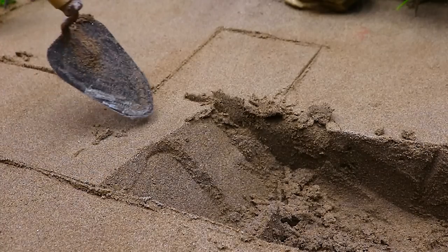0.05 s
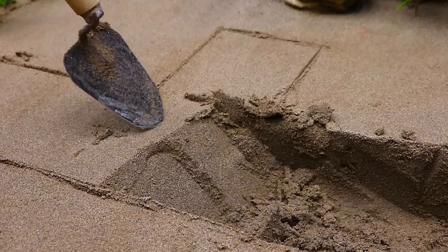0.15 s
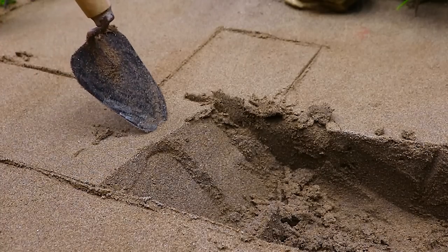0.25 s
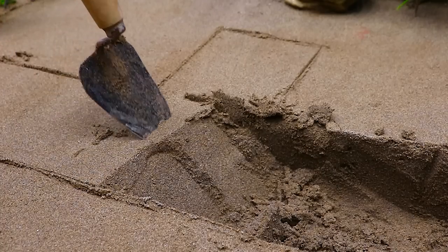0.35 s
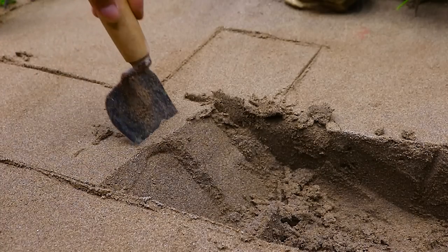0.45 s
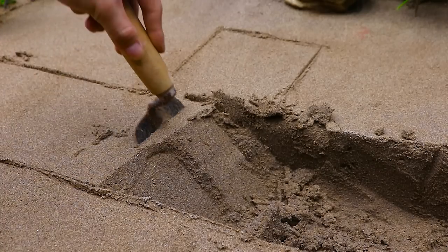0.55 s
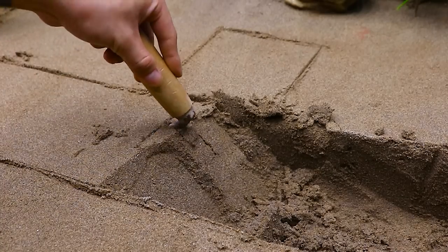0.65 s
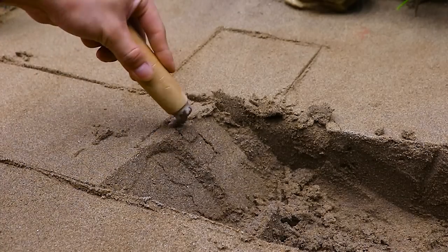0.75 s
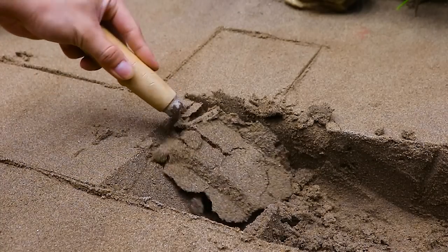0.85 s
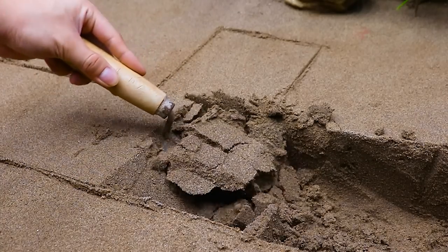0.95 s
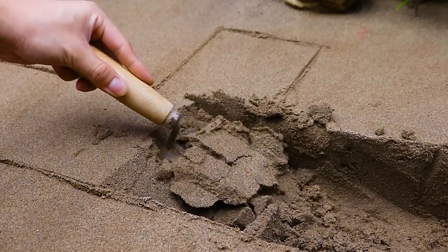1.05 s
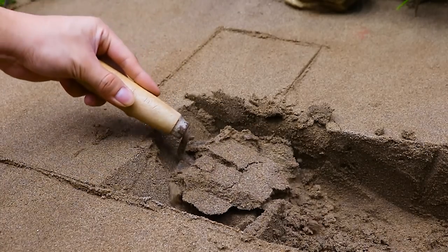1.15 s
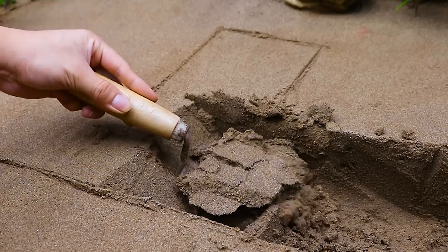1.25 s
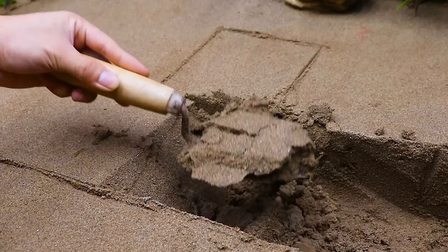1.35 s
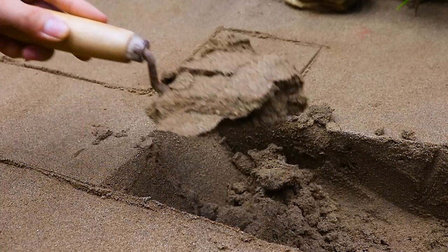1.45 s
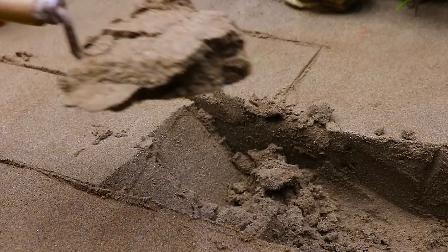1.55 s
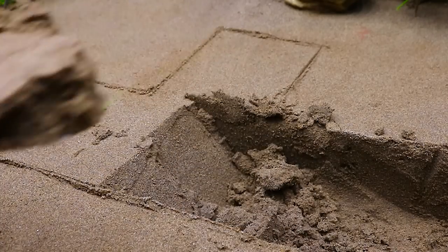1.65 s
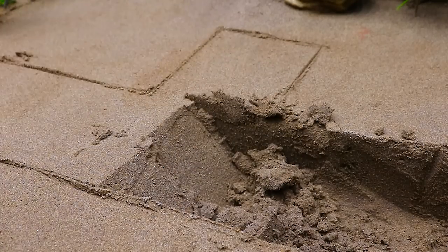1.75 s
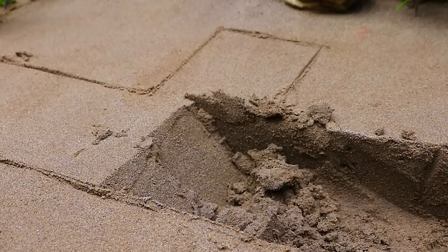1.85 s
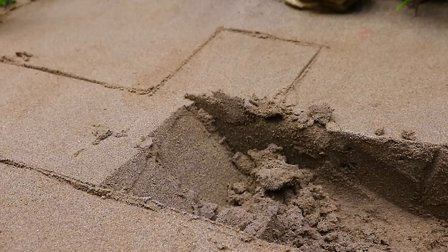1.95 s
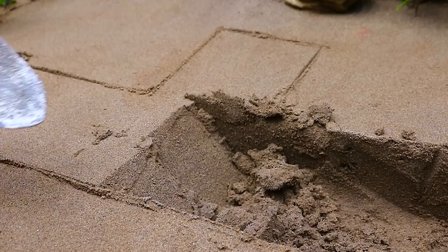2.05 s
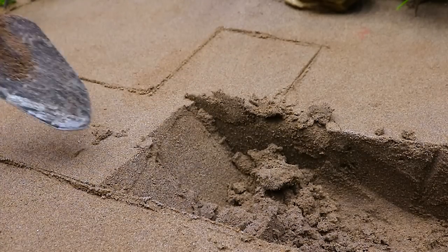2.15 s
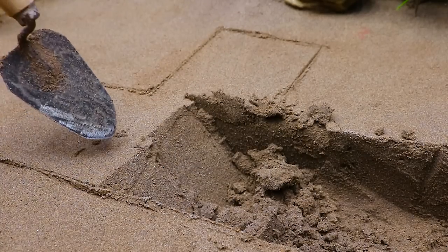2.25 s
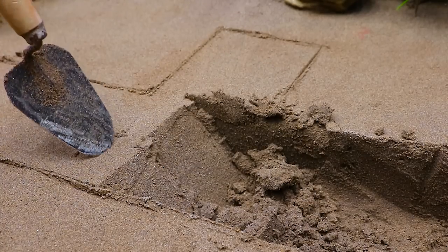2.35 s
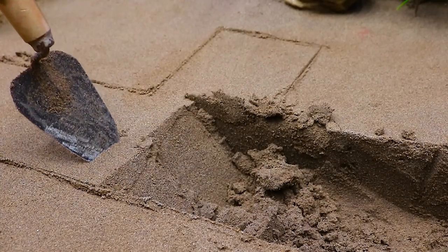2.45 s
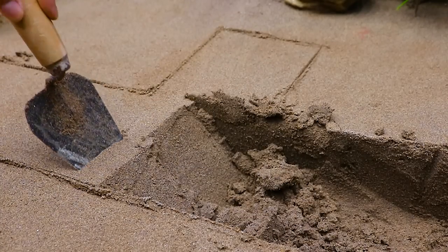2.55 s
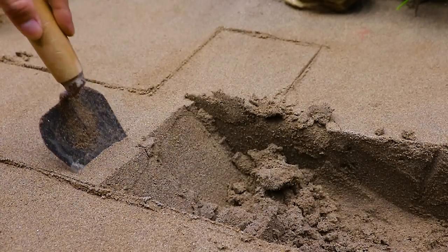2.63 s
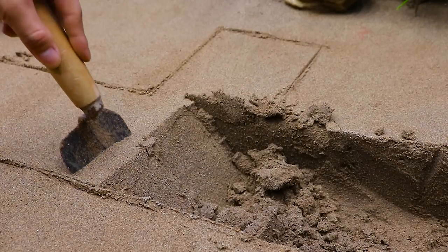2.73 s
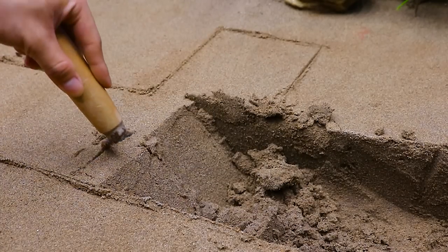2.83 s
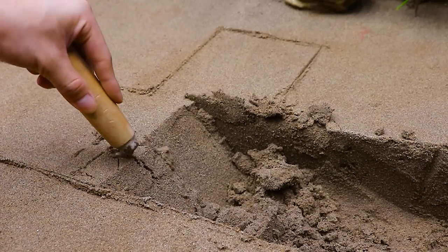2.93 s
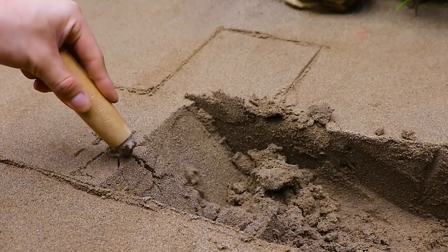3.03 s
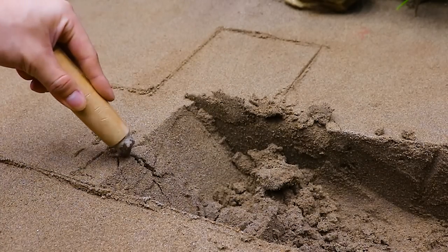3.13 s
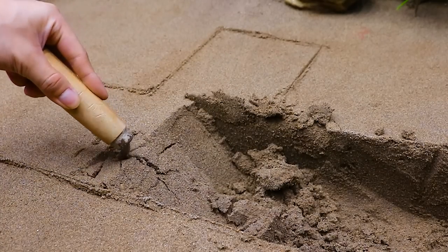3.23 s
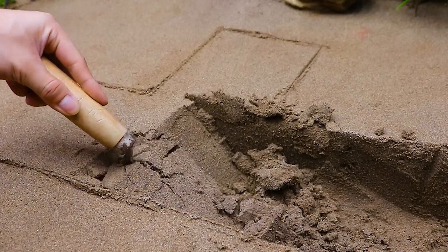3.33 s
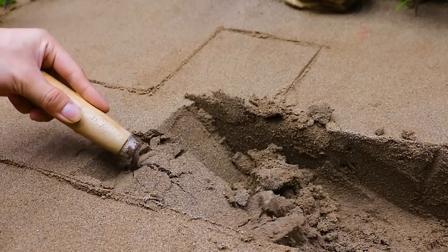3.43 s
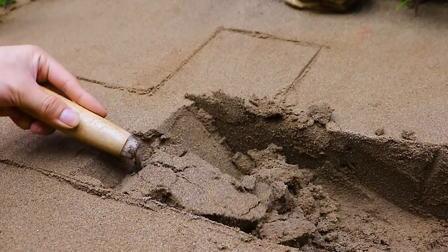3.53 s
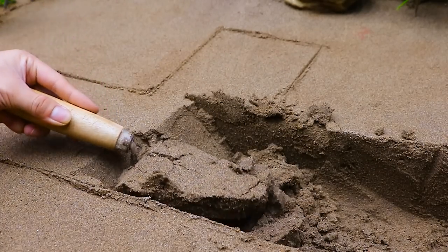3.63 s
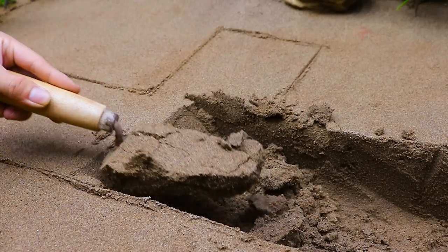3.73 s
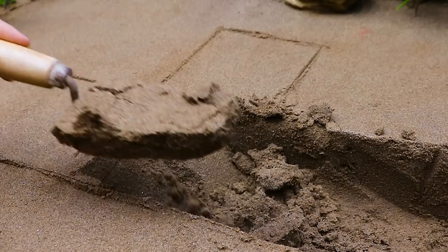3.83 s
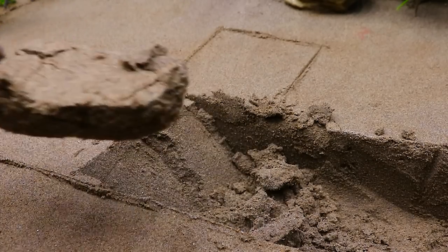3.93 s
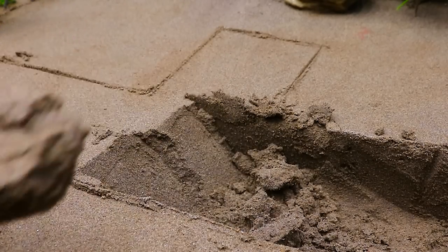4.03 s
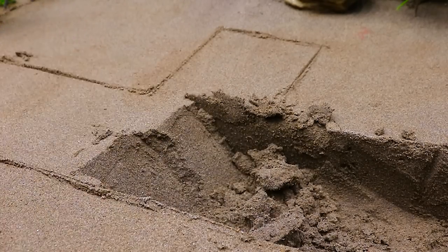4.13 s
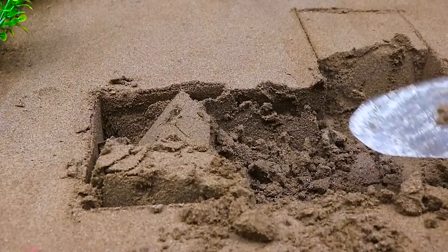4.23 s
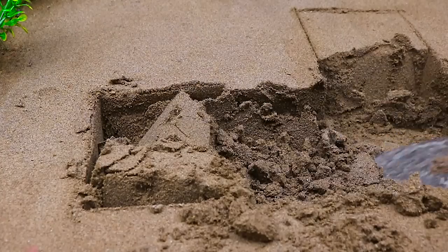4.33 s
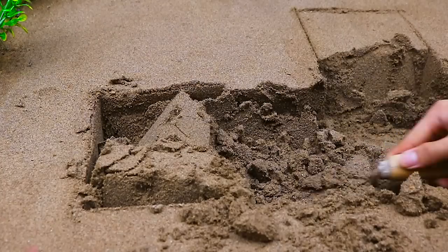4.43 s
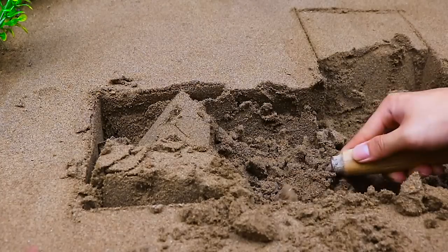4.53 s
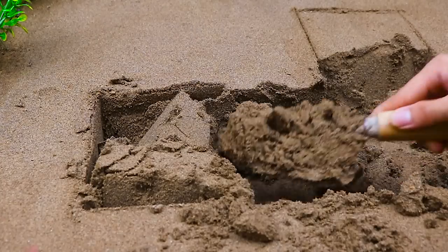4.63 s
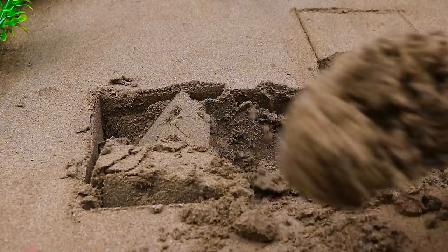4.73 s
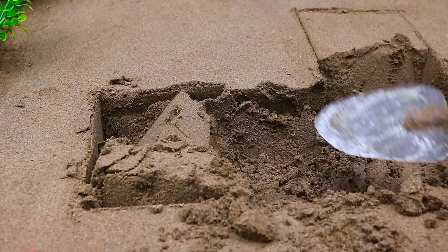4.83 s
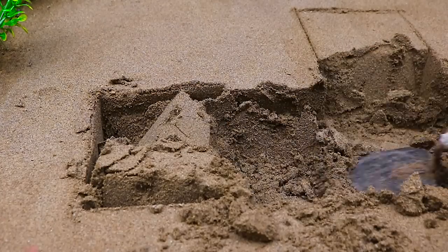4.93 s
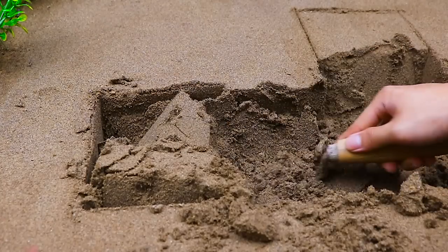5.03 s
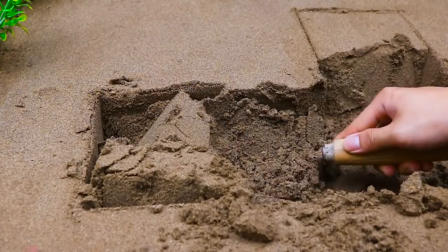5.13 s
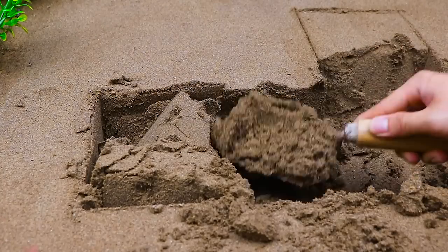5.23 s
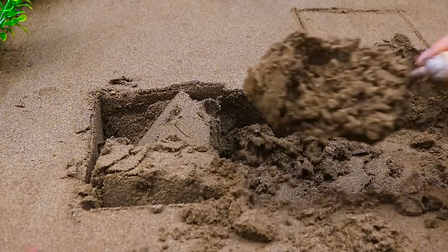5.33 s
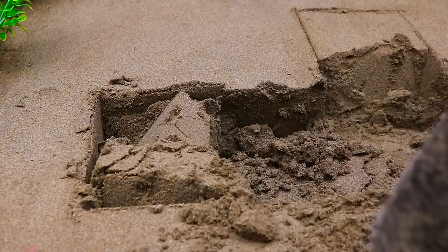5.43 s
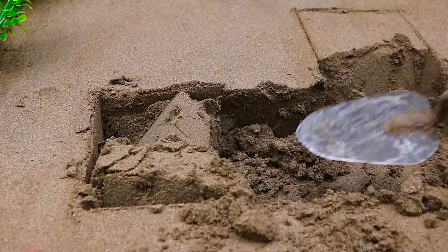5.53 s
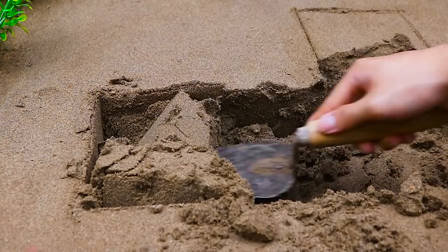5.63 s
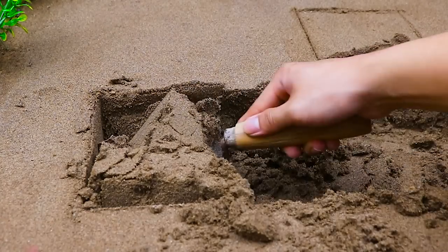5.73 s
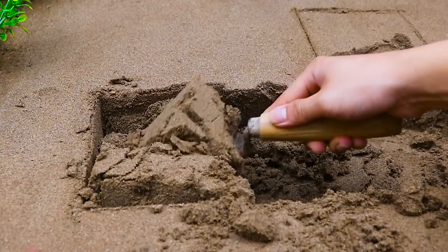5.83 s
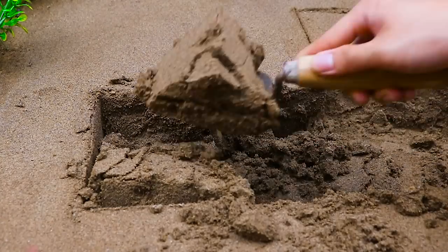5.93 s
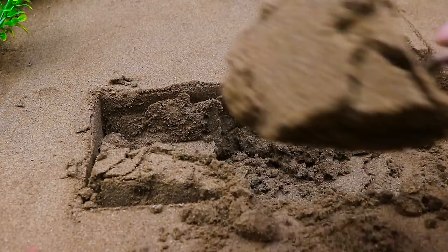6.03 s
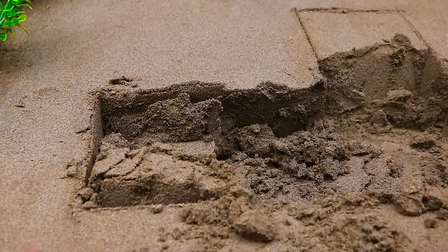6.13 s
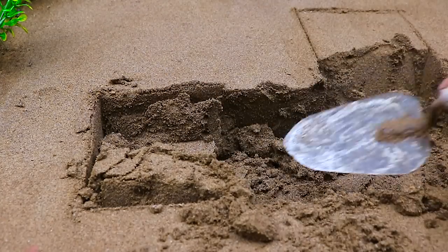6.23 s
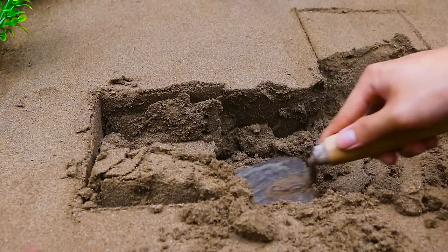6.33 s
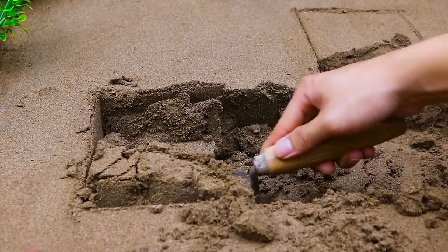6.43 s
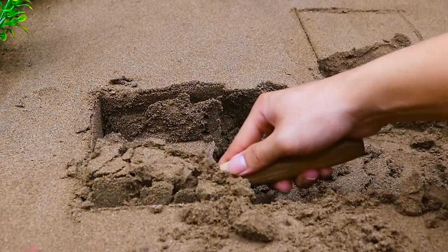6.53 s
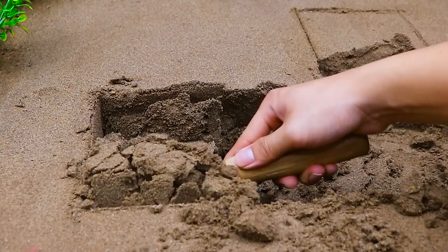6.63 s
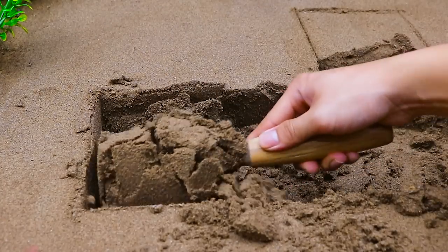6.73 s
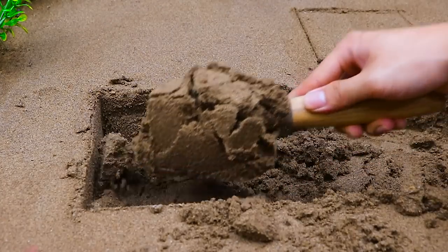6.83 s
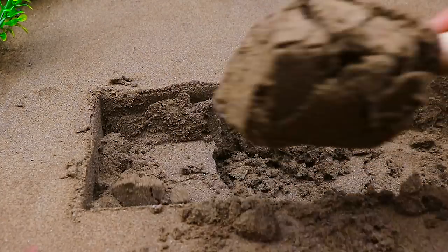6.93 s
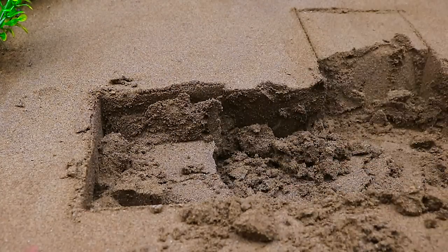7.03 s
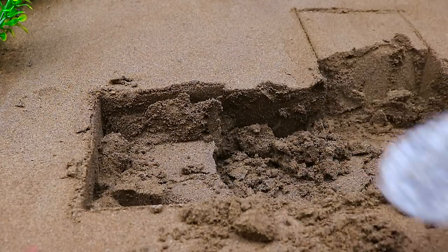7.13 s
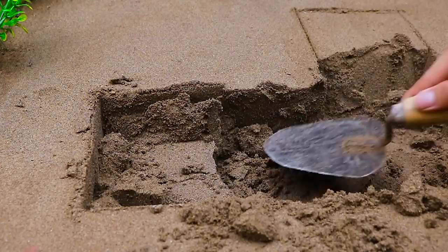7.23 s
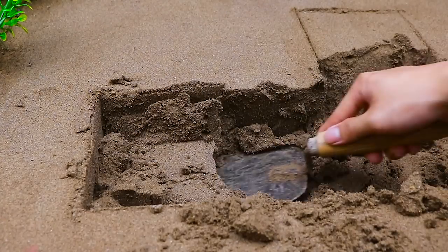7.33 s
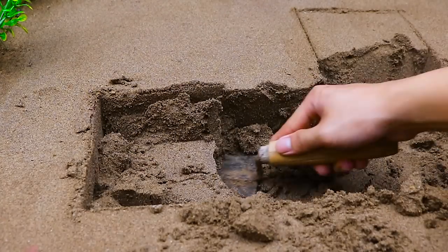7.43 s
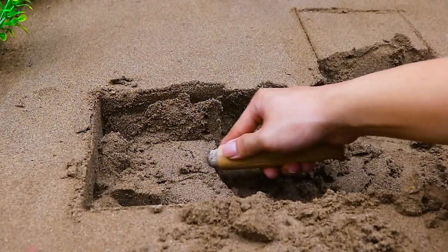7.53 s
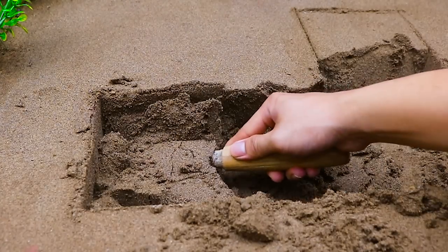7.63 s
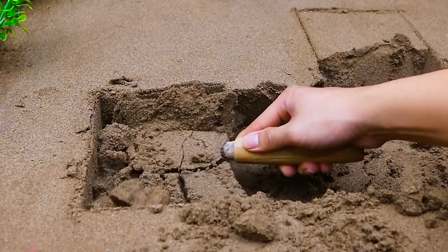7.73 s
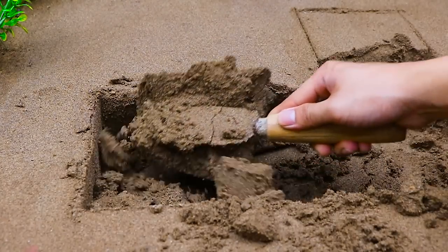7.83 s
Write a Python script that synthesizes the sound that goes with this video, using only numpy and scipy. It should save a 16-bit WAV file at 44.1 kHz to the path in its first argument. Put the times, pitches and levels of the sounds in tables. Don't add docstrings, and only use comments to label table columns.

```python
import sys
import numpy as np
from scipy import signal
from scipy.fft import rfft, irfft, next_fast_len
from scipy.io import wavfile
from scipy.ndimage import uniform_filter1d, map_coordinates

SR = 44100
rng = np.random.default_rng(int(sys.argv[2]) if len(sys.argv) > 2 else 0)


def natural_amplitude(level_db):
    exponent = np.asarray(level_db, float) / 20
    return 10 ** exponent


def dump_mix(stems):
    frames = np.atleast_2d(stems).T
    limited = np.clip(frames, -1, 1)
    pcm = np.round(limited * 32767).astype(np.int16)
    wavfile.write(sys.argv[1], SR, pcm)


N = 347067
T = np.arange(N) / SR
SCENE_CHANGE_S, TOP_HZ = 4.002, 15850

# (frequency [Hz], density [dB per Hz])
HUM_SPECTRUM = [(18, -40), (60, -40), (162, -22), (188, -11), (287, -1), (461, -3.5), (1250, -11.5),
                (2110, -13.5), (3390, -15.5), (4350, -11.5), (4920, -13), (12400, -23.5), (14200, -29.5),
                (14700, -71.5)]
# (time [s], level [dB])
HUM_LEVEL = [(0, -55), (1.2, -55), (2, -55.5), (2.5, -59.5), (3.3, -55), (4, -57)]
# (frequency [Hz], density [dB per Hz])
HUSH_SPECTRUM = [(18, -41.5), (30, -11.5), (571, -7), (1660, -11), (1840, -2.5), (2370, -9), (2690, -6),
                 (4470, -21.5), (12400, -35), (13000, -60.5)]

# (centre [Hz], width [Hz], level [dB])
CHORUS_BANDS = [(2360, 700, -1), (3600, 1500, 4.5), (3790, 2400, -7.5)]
# (time [s], level [dB])
CHORUS_LEVEL = [(0.0, -47.5), (0.3, -53), (0.98, -45.5), (1.1, -49), (1.28, -45.5), (2.31, -48.5),
                (2.56, -60), (2.99, -51), (3.3, -67), (4.0, -67)]
# (centre [Hz], width [Hz], level [dB])
LATE_CHORUS_BANDS = [(1880, 160, -18), (2720, 220, -14), (4400, 520, 0)]
# (time [s], level [dB])
LATE_CHORUS_LEVEL = [(5.9, -85), (6.15, -65), (6.9, -83), (7.2, -74.5), (7.87, -67.5)]
# (time [s], level [dB])
DOVE_LEVEL = [(1.8, -74), (1.95, -57.5), (2.15, -54.5), (2.25, -74), (2.5, -62), (2.62, -42), (2.77, -39.5),
              (2.81, -46.5), (2.85, -80)]
# (centre [Hz], width [Hz], level [dB])
LINGER_BANDS = [(1850, 180, 3), (2250, 270, 2)]
LINGER_DB, LINGER_T60_S = -67.5, 4.7

# (delay [s], level [dB])
TRUNK_ECHOES = [(.005, 0), (.018, -1), (.031, -3), (.047, -10), (.075, -12)]
# (frequency [Hz], gain [dB])
LEAF_RETURN = [(1500, -4.5), (2400, 0), (6000, 4)]

# (start [s], end [s], swing rate [Hz], depth [ratio], extra initial depth [ratio])
TRILLS = [
    (1.154, 1.182, 40, .1, 0),
    (4.128, 4.215, 62, .03, .07),
    (4.816, 4.905, 56, .065, .06),
]
# (time [s], length [s], from [Hz], to [Hz], level [dB])
SLURS = [(.7, .018, 2660, 3010, -45), (1.14, .014, 2300, 3150, -40), (1.154, .028, 2620, 2640, -39),
         (1.075, .058, 2700, 1960, -44), (2.388, .09, 3250, 2385, -44), (2.928, .047, 1620, 1700, -54),
         (2.35, .03, 6500, 5550, -59), (1.975, .016, 4050, 3850, -46), (2.86, .046, 2910, 2885, -52),
         (0, .02, 4660, 4600, -56), (.641, .022, 4400, 4750, -55), (3.17, .065, 5400, 5220, -67),
         (3.23, .05, 4750, 4650, -68), (3.56, .1, 5300, 5230, -77)]
# (time [s], length [s], from [Hz], to [Hz], level [dB])
FLICKS = [
    (.233, .012, 3700, 2550, -57),
    (.245, .028, 3300, 2650, -54),
    (1.661, .068, 3500, 4490, -57),
    (2.243, .033, 3000, 3930, -45),
    (1.615, .028, 3000, 3900, -56),
    (.904, .014, 2250, 3150, -45),
]
# (time [s], length [s], from [Hz], to [Hz], level [dB])
HOOKS = [
    (1.5, .078, 2140, 2560, -42),
    (1.845, .07, 3370, 3020, -37.5),
    (1.73, .025, 4500, 3800, -60),
]
# (time [s], length [s], from [Hz], to [Hz], level [dB])
SAGS = [
    (.926, .083, 3200, 2630, -36),
]
# (time [s], length [s], edge [Hz], bottom [Hz], level [dB])
DIPS = [
    (2.833, .13, 2330, 2215, -52),
]
# (time [s], length [s], from [Hz], to [Hz], level [dB])
CHIRPS = [(1.578, .022, 2450, 1730, -46), (1.642, .02, 3850, 3070, -52), (1.785, .02, 3900, 3040, -49),
          (2.172, .018, 4300, 3350, -55), (.657, .013, 3900, 4300, -51), (.668, .02, 4250, 3900, -56),
          (.68, .04, 3400, 3500, -59), (1.05, .018, 3200, 3400, -48), (1.362, .023, 3450, 3000, -49),
          (1.475, .015, 3500, 3950, -56), (1.5, .022, 3600, 3050, -51), (1.835, .014, 3600, 3400, -50),
          (.916, .012, 3950, 3250, -52), (1.885, .015, 4200, 3500, -54), (1.958, .02, 3500, 5600, -61),
          (1.978, .018, 3370, 3280, -46), (2.018, .02, 4900, 3660, -53), (2.2, .045, 3600, 5700, -63),
          (2.224, .026, 3300, 4250, -54), (2.705, .025, 3120, 2410, -46)]
# (time [s], length [s], from [Hz], to [Hz], level [dB])
TWITTER = [(.75, .02, 3100, 2950, -54), (.755, .1, 2400, 2250, -59), (1.03, .05, 2900, 3500, -52),
           (1.2, .015, 2600, 3300, -46), (1.235, .015, 2600, 3300, -48), (2.03, .04, 4100, 3700, -52),
           (2.07, .03, 3400, 3200, -56), (.892, .011, 3650, 3800, -52), (1.31, .01, 4000, 4150, -60),
           (1.445, .02, 4870, 4000, -57), (1.68, .013, 2860, 3380, -52), (1.69, .017, 3800, 4060, -56),
           (2.357, .017, 2970, 3430, -56), (.795, .04, 1650, 1760, -52), (1.33, .054, 1980, 2290, -52),
           (1.33, .04, 1460, 1850, -57), (2.09, .045, 1680, 1860, -57), (1.44, .03, 5700, 5300, -64),
           (1.785, .016, 1570, 1860, -55), (.58, .06, 3850, 4080, -63), (1.075, .02, 3600, 3200, -49),
           (3.66, .04, 4700, 4750, -70), (3.76, .2, 4650, 4350, -80), (.13, .03, 4300, 3900, -60)]
# (time [s], length [s], top [Hz], held [Hz], level [dB], growth to end [dB])
LATE_CALLS = [
    (4.086, .118, 3730, 2540, -34.5, 4),
    (4.774, .127, 3780, 2450, -32, 0),
]
# (time [s], length [s], from [Hz], to [Hz], level [dB])
LATE_SLURS = [(4.346, .022, 1480, 2980, -38), (7.06, .03, 3500, 4800, -61), (7.135, .16, 2000, 1840, -67),
              (7.845, .025, 2180, 2450, -60), (7.205, .03, 4450, 4400, -63), (7.17, .11, 2800, 2650, -70),
              (7.595, .015, 4500, 4700, -58)]
# (time [s], length [s], from [Hz], to [Hz], level [dB])
LATE_CHIRPS = [(6.155, .03, 4710, 3900, -61), (6.712, .025, 4900, 4100, -58),
               (7.325, .025, 5000, 4250, -60), (7.04, .02, 4200, 3400, -66), (6.96, .05, 2700, 2650, -72),
               (4.368, .012, 3000, 2160, -39)]
# (time [s], length [s], edge [Hz], top [Hz], level [dB])
LATE_ARCS = [
    (7.672, .12, 2050, 2620, -54),
    (7.025, .03, 3500, 4300, -66),
    (7.283, .04, 3150, 3900, -67),
]
# (time [s], length [s], from [Hz], to [Hz], level [dB])
LATE_SINKS = [
    (4.379, .09, 2160, 1790, -36),
    (5.085, .1, 2180, 1750, -40),
]
SLUR_S, STRAIGHT_S, FLICK_S, HOOK_S, SAG_S, SINK_S = .0115, 3, .006, -.05, .019, .027
ARCH_RISE_S, ARCH_TOP_S, ARCH_FALL_S, ARCH_START_RATIO, ARCH_TOP_DB = .009, .007, .026, .88, -11

# (time [s], sliding along steel [dB], load on bed [dB])
STAB = [
    (.33, -88, -66),
    (.376, -76, -70),
    (.382, -27, -42),
    (.434, -24, -37),
    (.48, -27.5, -30),
    (.54, -60, -46),
    (.578, -53, -50),
    (.66, -64, -59),
    (.7, -72, -66),
]
# (time [s], sliding along steel [dB], load on bed [dB])
PUSH = [
    (2.42, -88, -64),
    (2.446, -75, -68),
    (2.457, -46, -60),
    (2.461, -33, -46),
    (2.62, -27, -35),
    (2.662, -32, -29),
    (2.728, -48, -37),
    (2.748, -56, -48),
    (2.86, -75, -62),
]
# (middle [s], length [s], sliding [dB], load [dB])
STAB_SLIDES = [
    (0.717, 0.095, -57, -52.5),
    (0.804, 0.27, -48, -52),
    (0.87, 0.059, -53, -48.5),
    (0.964, 0.12, -51.5, -46),
    (1.044, 0.11, -53.5, -51),
]
# (middle [s], length [s], sliding [dB], load [dB])
PUSH_SLIDES = [
    (2.949, 0.32, -48, -54),
    (3.16, 0.22, -49, -73),
    (3.261, 0.26, -47.5, -70),
    (3.4, 0.59, -51, -81),
    (3.55, 0.22, -51.5, -82),
]
# (delay [s], faded out by [s])
STAB_REPEATS = [
    (4.0, .9),
    (4.6, .9),
    (5.32, .9),
    (7.04, .9),
]
# (delay [s], faded out by [s])
PUSH_REPEATS = [
    (3.9, 3.22),
]
STAB_SPAN_S, PUSH_SPAN_S = (0.334, 1.163), (2.43, 3.78)
# (time [s], level [dB])
TRICKLE_LEVEL = [(3.05, -87.5), (3.2, -68), (3.35, -47.5), (3.5, -53), (3.74, -55), (3.76, -100)]
# (time [s], peak [dB], low share [dB])
SNAPS = [(0.382, -12.5, -8), (0.405, -27, 11), (0.432, -16, -3), (0.4457, -27.5, 14), (0.457, -16.5, 4),
         (0.4718, -18, -2), (0.9694, -39, 6), (2.45, -21, -20), (2.46, -22, -10), (2.476, -19, -3),
         (2.682, -28.5, 5), (3.258, -26.5, -25), (3.219, -33, -25), (3.322, -24.5, -27),
         (3.3824, -20.5, -37), (3.424, -27, -36), (3.5043, -28, -30), (3.5994, -37, -17)]
# (time [s], peak [dB], pitch [Hz])
THUDS = [(0.382, -39.5, 114.3), (0.381, -33.5, 272), (0.433, -26.5, 360), (0.461, -21, 264),
         (0.479, -40, 373), (0.954, -29.5, 357), (2.422, -51, 300), (2.4245, -51, 523), (2.614, -25, 367),
         (2.662, -29, 295), (2.717, -31, 453), (2.748, -35, 332)]
# (time [s], peak [dB])
CLODS = [(.4635, -10.5), (.468, -30), (0.475, -20), (.483, -26.5), (.492, -27), (2.618, -17), (2.632, -17),
         (2.6517, -11.5), (2.6585, -29), (2.667, -37.5), (2.681, -14.5), (2.6925, -21), (2.6975, -17),
         (2.709, -25), (2.7255, -27), (2.734, -28)]

# (frequency [Hz], density [dB per Hz])
GRIT_SPECTRUM = [(880, -33), (1500, -39.5), (1610, -21.5), (2290, -4.5), (2850, -10), (3310, -4),
                 (4430, -6.5), (9890, -7), (15700, -15.5), (16500, -30.5)]
# (frequency [Hz], density [dB per Hz])
FIZZ_SPECTRUM = [(9000, -30.5), (12000, -5), (15000, -2.5)]
# (frequency [Hz], density [dB per Hz])
RUMBLE_SPECTRUM = [(15, -17.5), (35, -1), (60, 0.5), (200, -3), (300, -41)]
# (centre [Hz], width [Hz], level [dB])
STEEL_MODES = [(1110, 47, -8.5), (2264, 95, 1.5), (3357, 200, -5.5), (5040, 100, 1), (5700, 190, -2.5),
               (6500, 67, 0), (6960, 110, -5), (8000, 60, -14.5), (9140, 260, -13), (9830, 90, -8.5),
               (10630, 60, -39.5)]
# (centre [Hz], width [Hz], level [dB])
BLADE_MODES = [(720, 130, -7), (1114, 239, 1.5), (1294, 556, -1), (3540, 1740, -9.5)]
# (centre [Hz], width [Hz], level [dB])
BED_MODES = [(280.7, 37, -2.5), (361, 20.3, 0.5), (502, 154, -4.5)]
# (frequency [Hz], left-right correlation [ratio])
TROWEL_ALIKE = [(200, 0.92), (1000, 0.96), (2500, 1), (5000, 0.028), (12000, 0.39)]
# (frequency [Hz], left over right [dB])
TROWEL_LEFT = [(60, 0.0), (110, 0.0), (200, -3.5), (380, -4.5), (700, -1.5), (1290, -1.5), (2380, -4.5),
               (4400, -4.5), (8120, -6.5), (15000, -6.5)]
REST_SLIDE_DB, REST_LOAD_DB, GROUND_DB, GROUND_POWER = -83.5, -71.5, -59, 0.25
CRUNCH_DB, CRUNCH_LAG_S = -2, 0.011
JOLT_DB, JOLT_S, HARD_CONTACT_DB = 8, 0.015, -33
FULL_RING_LOAD_DB, CLOD_S = -56, .00013


def unit(x):
    return x / np.sqrt(np.mean(x ** 2) + 1e-20)


def along(points, hz):
    f, v = np.transpose(points)
    return np.interp(np.log(hz + 1), np.log(f + 1), v)


def curves(rows):
    s, *cols = np.transpose(rows)
    return [np.interp(T, s, c) for c in cols]


def filtered(x, response):
    m = next_fast_len(N + 8192)
    return irfft(rfft(x, m) * response(np.fft.rfftfreq(m, 1 / SR)), m)[..., :N]


def modes(table):
    def response(f):
        total = 0
        for k, (centre, width, db) in enumerate(table):
            damping = 1j * f * width
            total = total + (-1) ** k * natural_amplitude(db) * damping / (centre * centre - f * f + damping)
        return total
    return response


def colour(spectrum):
    return lambda hz: natural_amplitude(along(spectrum, hz))


def wobble(rate_hz):
    return map_coordinates(rng.standard_normal(int(N * rate_hz / SR) + 4), [T * rate_hz])


def grains(clump_s, spread_db):
    knots = rng.standard_normal(int(N / SR / .0005) + 9)
    clumps = uniform_filter1d(knots, size=max(1, round(clump_s / 0.0008)))
    size = natural_amplitude(spread_db * unit(np.interp(T, np.arange(len(knots)) / 2000, clumps)))
    return unit(size * rng.standard_normal((2, N)))


def outdoors():
    hum_noise = grains(clump_s=0.08, spread_db=1.5)[0]
    hum = natural_amplitude(curves(HUM_LEVEL)[0]) * unit(filtered(hum_noise, colour(HUM_SPECTRUM)))
    mid, side = unit(filtered(rng.standard_normal((2, N)), colour(HUSH_SPECTRUM)))
    hush = natural_amplitude(-68.0) * (mid + 0.12 * np.array([side, -side]))
    return np.where(T < SCENE_CHANGE_S, hum, hush)


def chorus(bands):
    return unit(filtered(grains(clump_s=0.0088, spread_db=3.5)[0], lambda f: modes(bands)(f) ** 2))


def far_birds():
    early = natural_amplitude(curves(CHORUS_LEVEL)[0] - 6.5) * chorus(CHORUS_BANDS)
    late = natural_amplitude(curves(LATE_CHORUS_LEVEL)[0]) * chorus(LATE_CHORUS_BANDS)
    coo = unit(filtered(rng.standard_normal(N), lambda f: modes([(368, 36, 0)])(f) ** 2))
    decay_db = LINGER_DB - 60 * (T - SCENE_CHANGE_S) / LINGER_T60_S
    linger = (T > SCENE_CHANGE_S) * natural_amplitude(decay_db) * chorus(LINGER_BANDS)
    return np.where(T < SCENE_CHANGE_S, early, late) + natural_amplitude(curves(DOVE_LEVEL)[0]) * coo + linger


def glides(table, settle_s, soft_db, swell_db):
    u = np.linspace(0, 1, num=24)
    level_db = soft_db * np.exp(-u / .13) + swell_db * (u - .5) - 7 * u ** 10
    notes = []
    for s, length, from_hz, to_hz, db in table:
        if settle_s:
            path = np.expm1(-u * length / settle_s) / np.expm1(-length / settle_s)
        else:
            path = np.sin(np.pi * u)
        hz = from_hz * (to_hz / from_hz) ** path
        notes.append(np.transpose([s + length * u, hz, db + level_db]))
    return notes


def arches():
    notes = []
    for s, length, top, held, db, growth_db in LATE_CALLS:
        risen = s + ARCH_RISE_S
        leaves_top = risen + ARCH_TOP_S
        notes.append([(s, ARCH_START_RATIO * top, db - 24),
                      (risen, top, db + ARCH_TOP_DB - 4),
                      (leaves_top, .99 * top, db + ARCH_TOP_DB),
                      (leaves_top + ARCH_FALL_S, held, db),
                      (s + .93 * length, held, db + growth_db),
                      (s + length, held, db - 20)])
    return notes


def song(notes, warble, flutter_db):
    bend = 1 + warble * wobble(110)
    throb = natural_amplitude(flutter_db * wobble(130))
    for start, end, rate, depth, extra in TRILLS:
        age = np.clip(T - start, 0, end - start)
        swing = 1 - np.cos(2 * np.pi * rate * age)
        bend += swing * (depth + extra * np.exp(-age / .015)) * (T < end)
    out = np.zeros(N)
    for rows in notes:
        s, hz, db = np.transpose(rows)
        span = slice(round(s[0] * SR), round(s[-1] * SR))
        t = T[span]
        phase = 2 * np.pi * np.cumsum(np.interp(t, s, hz) * bend[span]) / SR
        edge = np.clip(np.minimum(t - s[0], s[-1] - t) / .003, 0, 1)
        out[span] += np.sqrt(2) * natural_amplitude(np.interp(t, s, db)) * edge * throb[span] * np.sin(phase)
    return out


def trees(x, early_s, late_s, late_db, trunk_db, stir_db):
    t = np.arange(2 * SR) / SR
    decay = natural_amplitude(-60 * t / early_s) + natural_amplitude(late_db - 60 * t / late_s)
    tail = rng.standard_normal((2, len(t))) * decay
    tail /= np.linalg.norm(tail[0])
    for s, db in TRUNK_ECHOES:
        tail[0, round(s * SR)] += natural_amplitude(db + trunk_db)
    stir = unit(natural_amplitude(stir_db * wobble(160)))
    echo = signal.fftconvolve(x[None], tail, axes=1)[:, :N]
    return filtered(stir * echo, colour(LEAF_RETURN))


def early_birds():
    held = glides(SLURS, SLUR_S, soft_db=-5, swell_db=3)
    held += glides(FLICKS, FLICK_S, soft_db=-9, swell_db=2)
    held += glides(HOOKS, HOOK_S, soft_db=-6, swell_db=5)
    held += glides(SAGS, SAG_S, soft_db=-4, swell_db=4)
    held += glides(DIPS, None, soft_db=-3, swell_db=-3)
    quick = glides(CHIRPS, STRAIGHT_S, soft_db=-6, swell_db=5)
    faint = glides(TWITTER, STRAIGHT_S, soft_db=-6, swell_db=5)
    near = song(held, warble=.006, flutter_db=2.5) + song(quick, warble=.008, flutter_db=3)
    distant = song(faint, warble=.025, flutter_db=4)
    wood = trees(near + distant, early_s=.16, late_s=1.0, late_db=-10, trunk_db=-22, stir_db=4)[0]
    return natural_amplitude(5.5) * near + natural_amplitude(4.5) * distant + natural_amplitude(4.5) * wood


def late_birds():
    notes = arches() + glides(LATE_SLURS, SLUR_S, soft_db=-3, swell_db=-5)
    notes += glides(LATE_CHIRPS, STRAIGHT_S, soft_db=-4, swell_db=2)
    notes += glides(LATE_ARCS, None, soft_db=-15.5, swell_db=-2.5)
    notes += glides(LATE_SINKS, SINK_S, soft_db=2, swell_db=-5.5)
    near = song(notes, warble=.005, flutter_db=2)
    echo, wide = trees(near, early_s=0.25, late_s=2.3, late_db=-6.5, trunk_db=-7.0, stir_db=2.0)
    out = natural_amplitude(1.5) * near + natural_amplitude(-0.5) * (echo + 0.33 * np.array([wide, -wide]))
    fade_in = np.clip((T - 4.135) / .02, 0, 1)
    fade_out = np.clip((4.4 - T) / .02, 0, 1)
    overtones = filtered(fade_in * (.6 * out ** 2 + 1.2 * out ** 3), lambda hz: hz > 4000)
    return out + fade_out * overtones


def birds():
    return early_birds() * (T < SCENE_CHANGE_S) + late_birds() + far_birds()


def crumbly(x, patchy_db):
    z = signal.stft(x, nperseg=256)[2]
    field = uniform_filter1d(rng.standard_normal(z.shape[1:]), size=3, axis=0)
    field = uniform_filter1d(field, size=6, axis=1)
    return signal.istft(z * natural_amplitude(patchy_db * unit(field)), nperseg=256)[1][:, :N]


def snaps():
    crack, knock, thud = np.zeros((3, 2, N))
    t = np.arange(2000) / SR
    for s, db, low_db in SNAPS:
        span = slice(round(s * SR), round(s * SR) + len(t))
        crack[:, span] += natural_amplitude(db - 60 * t / 0.024) * rng.standard_normal((2, len(t)))
        knock[0, span] += natural_amplitude(db + low_db + 9.5 - 60 * t / 0.053) * rng.standard_normal(len(t))
    for s, db, hz in THUDS:
        span = slice(round(s * SR), round(s * SR) + len(t))
        swell = natural_amplitude(db + 3 - 60 * t / .06) * (1 - np.exp(-t / .004))
        thud[0, span] += swell * np.sin(2 * np.pi * hz * t)
    for s, db in CLODS:
        span = slice(round(s * SR), round(s * SR) + len(t))
        push = (1 - t / CLOD_S) * np.exp(-t / CLOD_S) * np.minimum(1, t / .0001)
        thud[0, span] += natural_amplitude(db - 0.5) * push

    def crack_colour(hz):
        return colour(GRIT_SPECTRUM)(np.minimum(hz, 12000)) * np.clip((TOP_HZ - hz) / 200, .15, 1)

    thud = filtered(thud, lambda hz: 1 / (1 + (130 / (hz + 1)) ** 4))
    return filtered(crack, crack_colour) + filtered(knock, modes(STEEL_MODES)) + thud


def sand_layers():
    hiss = filtered(crumbly(grains(clump_s=0.0037, spread_db=1.0), patchy_db=3.0), colour(GRIT_SPECTRUM))
    ring = filtered(grains(clump_s=.008, spread_db=4.5), modes(STEEL_MODES))
    coarse = grains(clump_s=.003, spread_db=2)
    blade = filtered(coarse, modes(BLADE_MODES))
    bed = filtered(coarse, modes(BED_MODES))
    rumble = filtered(rng.standard_normal((2, N)), colour(RUMBLE_SPECTRUM))
    rustle = filtered(coarse[::-1], modes([(2930, 1190, 0)]))
    spray = filtered(coarse, colour(FIZZ_SPECTRUM))
    layers = (hiss, ring, blade, bed, rumble, rustle, spray)
    levels_db = (0.5, -5, 1.5, 0, 0, -4, -12.5)
    return [natural_amplitude(db) * unit(layer) for db, layer in zip(levels_db, layers)]


def stroke(entry, slides, span_s, sand):
    contact_s, contact_db = entry[2][:2]
    hard = contact_db > HARD_CONTACT_DB
    inside = np.clip(np.minimum(T - span_s[0], span_s[1] - T) / 0.04, 0, 1)
    after = T > entry[3][0]
    slide, load = (natural_amplitude(db) ** 2 for db in curves(entry))
    slide = slide + after * natural_amplitude(REST_SLIDE_DB) ** 2
    load = load + after * natural_amplitude(REST_LOAD_DB) ** 2
    for s, length, slide_db, load_db in slides:
        swell = np.cos(np.pi * np.clip((T - s) / length, -.5, .5)) ** 4
        slide = slide + natural_amplitude(slide_db) ** 2 * swell
        load = load + natural_amplitude(load_db) ** 2 * swell
    slide, load = np.sqrt(slide), np.sqrt(load)
    ring = slide * np.minimum(1, load / natural_amplitude(FULL_RING_LOAD_DB))
    crunch = natural_amplitude(CRUNCH_DB) * np.interp(T - CRUNCH_LAG_S, T, load)
    jolt_db = JOLT_DB * hard * (T > contact_s) * np.exp(-np.abs(T - contact_s) / JOLT_S)
    ground = natural_amplitude(GROUND_DB + jolt_db) * (load / natural_amplitude(-48.5)) ** GROUND_POWER
    rustle = ring * (T > entry[6][0])
    spray = slide * hard * (T < entry[5][0])
    gains = (slide, ring, load, crunch, ground, rustle, spray)
    return inside * sum(gain * layer for gain, layer in zip(gains, sand))


def placed(pair):
    def spread(hz):
        turn = np.arccos(np.clip(along(TROWEL_ALIKE, hz), -1, 1)) / 2
        return np.array([np.cos(turn), np.sin(turn)])

    def tilt(hz):
        return natural_amplitude(np.array([[.5], [-.5]]) * along(TROWEL_LEFT, hz))

    mid, side = filtered(pair, spread)
    both = filtered(np.array([mid + side, mid - side]), tilt)
    both[0] = np.roll(both[0], shift=4)
    return both


def trowel():
    sand = sand_layers()
    dry_grains = grains(clump_s=0.0022, spread_db=3.5)
    trickle = unit(filtered(dry_grains, modes([(9200, 2100, -1.6), (14600, 2000, 0.12)])))
    trickle = natural_amplitude(curves(TRICKLE_LEVEL)[0]) * (T > 3) * trickle
    cracks = snaps()
    out = np.zeros((2, N))
    stab = (STAB, STAB_SLIDES, STAB_SPAN_S), STAB_REPEATS, T < 2
    push = (PUSH, PUSH_SLIDES, PUSH_SPAN_S), PUSH_REPEATS, T > 2
    for motion, repeats, when in (stab, push):
        steady = stroke(*motion, sand) + when * trickle
        steady = filtered(steady, lambda hz: np.clip((TOP_HZ - hz) / 200 + .5, 0, 1) ** 2)
        first = placed(steady + when * cracks)
        out += first
        for delay_s, end_s in repeats:
            shift = round(delay_s * SR)
            out[:, shift:] += (first * np.clip((end_s - T) / 0.24, 0, 1))[:, :N - shift]
    return out


def scene():
    return outdoors() + birds() + trowel()


def low_pass(x):
    return signal.sosfilt(signal.butter(12, 16970, fs=SR, output="sos"), x)


def record(dry):
    mix = filtered(dry, lambda hz: 1 / (1 + (hz / 16500) ** 60))
    return low_pass(mix)


dry = scene()
out = record(dry)
dump_mix(out)
```